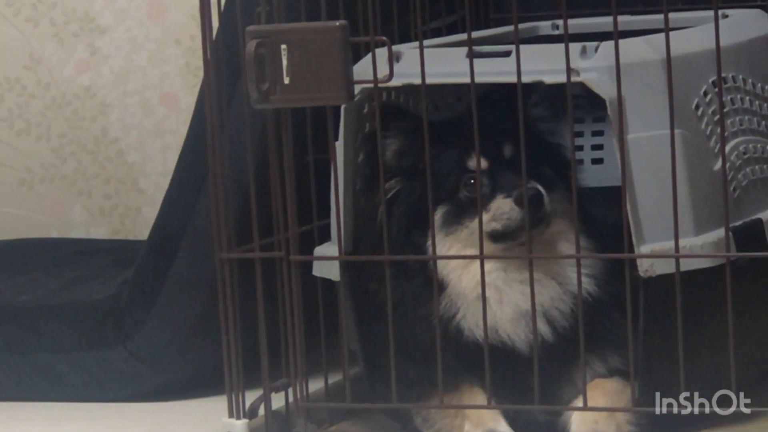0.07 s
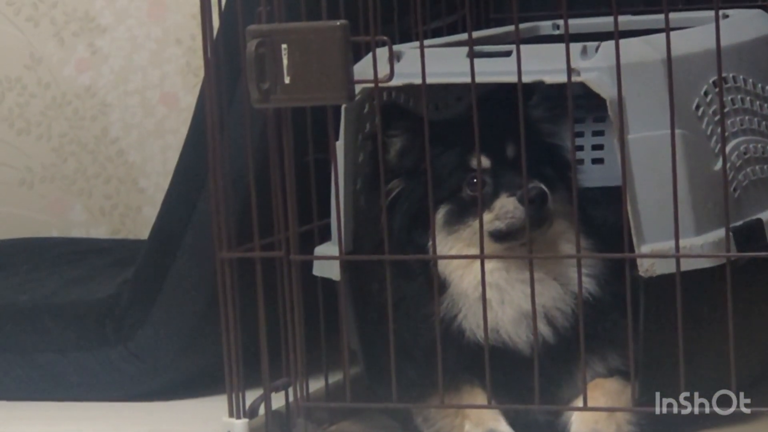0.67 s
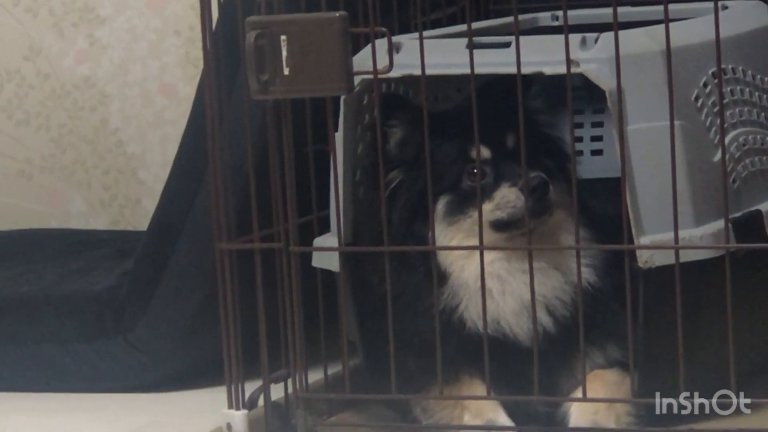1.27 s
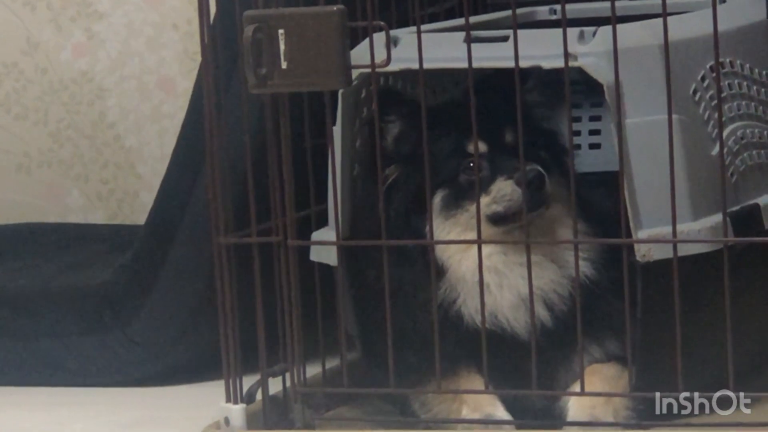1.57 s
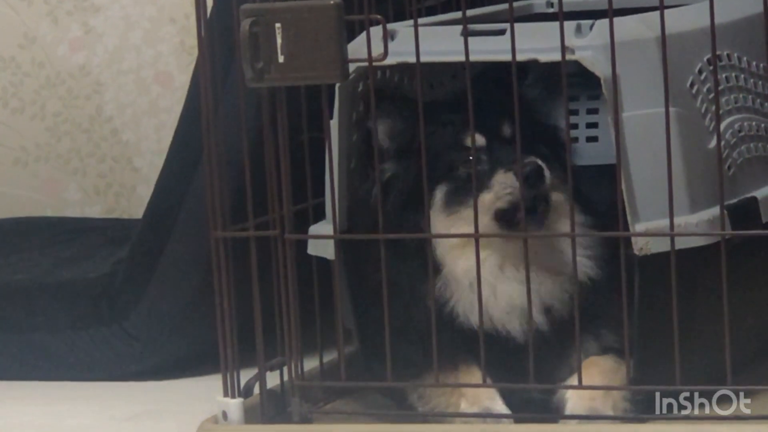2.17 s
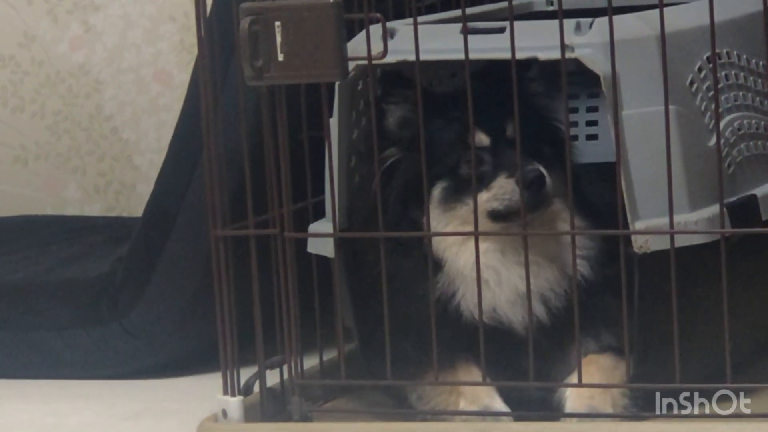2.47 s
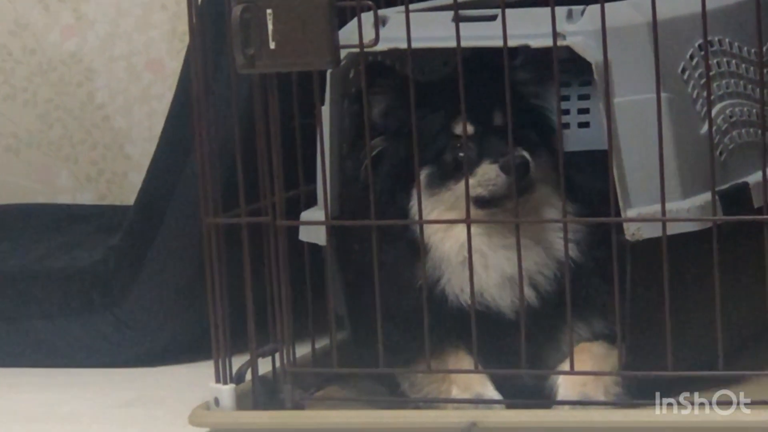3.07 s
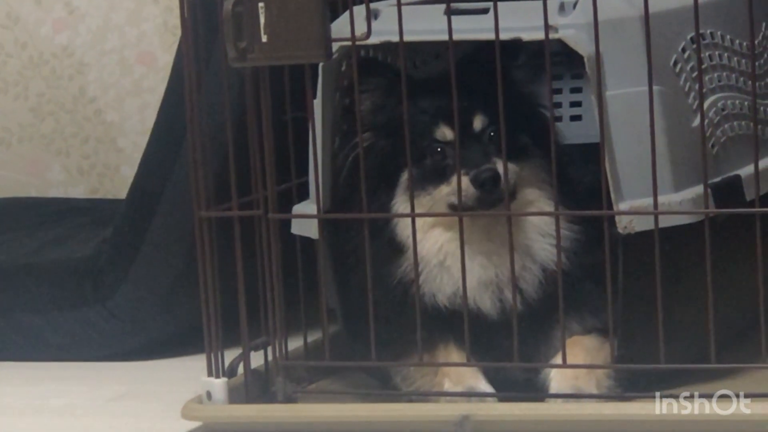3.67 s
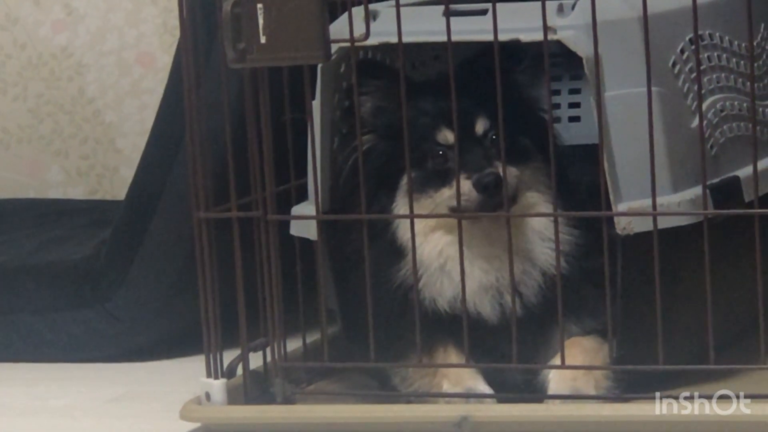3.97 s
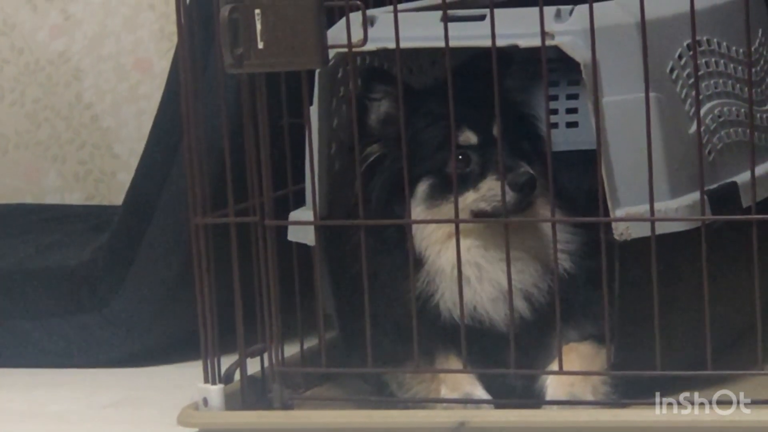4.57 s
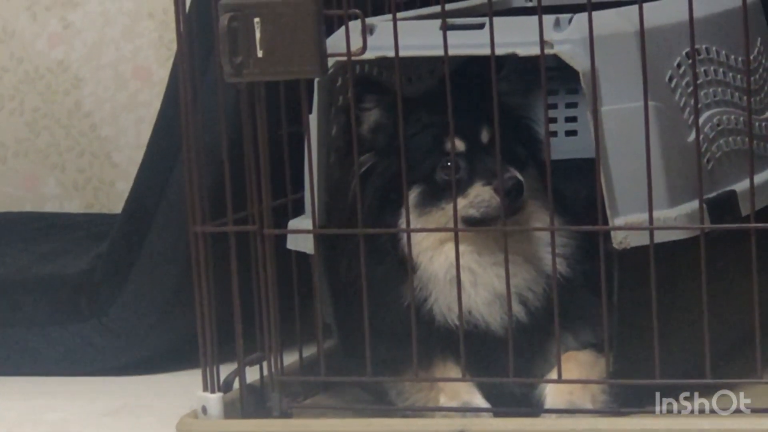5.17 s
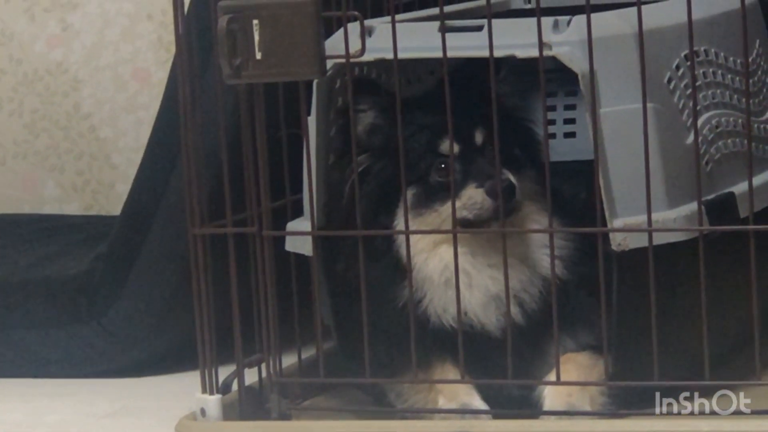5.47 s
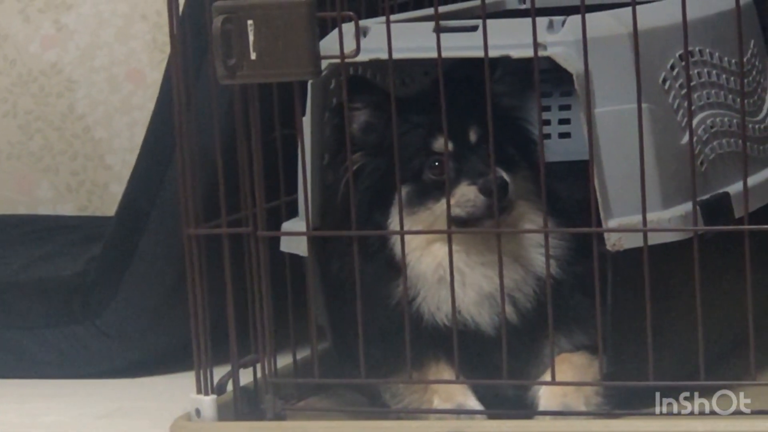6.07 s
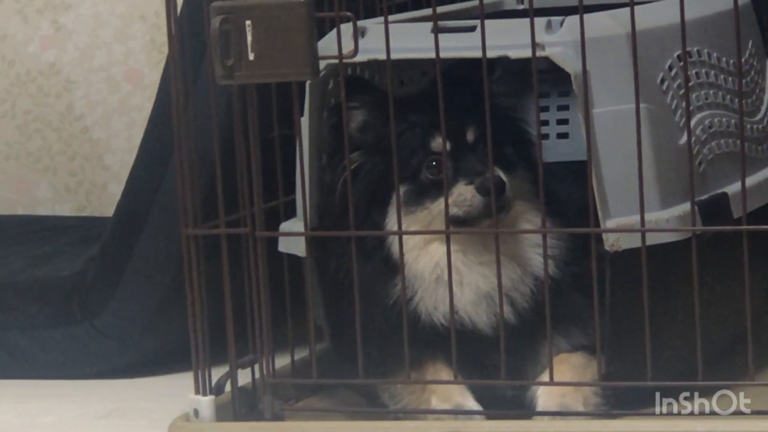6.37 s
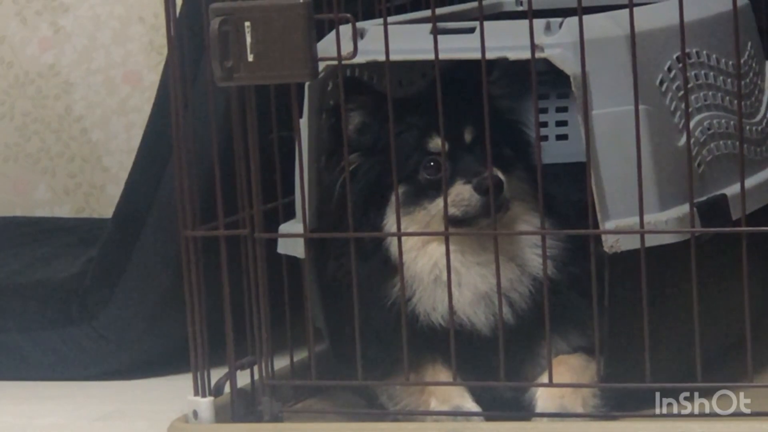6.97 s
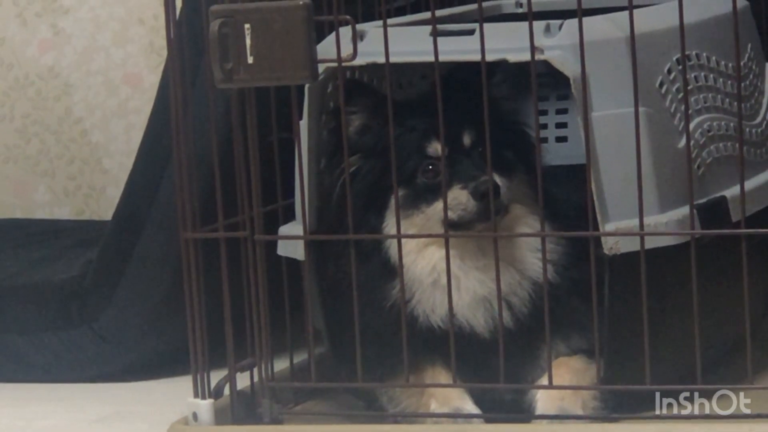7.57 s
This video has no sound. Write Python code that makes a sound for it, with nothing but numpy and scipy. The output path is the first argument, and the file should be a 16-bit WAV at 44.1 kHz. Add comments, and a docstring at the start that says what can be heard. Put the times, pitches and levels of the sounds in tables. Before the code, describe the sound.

A low, dull room tone runs throughout in a small, quiet room. Close to the microphone, a small dog lies in a plastic carrier inside a wire cage. At about 1 second it gives a soft, low, muffled wuff with its mouth shut, followed by a faint shuffle around 1.7 seconds. At about 2.1 seconds comes one sharp, raspy bark, by far the loudest sound: it starts in the nose, bursts open and drops in pitch, ringing briefly in the carrier and the room. After that there are only faint movements. A dull shuffle comes near 3.7 seconds, a tick at 4.4, and two light knocks at 5.4 and 5.6. Soft shuffles follow between 5.8 and 7 seconds, then two small ticks around 7.2. A barely audible sniff comes at 7.4 seconds, with a trace of fur rustling underneath.

```python
"""A small dog, close to the microphone, lying in a plastic carrier inside a wire cage in a quiet room.
It gives a muffled wuff with its mouth shut, then one sharp, raspy bark that starts in the nose and
bursts open: vocal folds and rushing air sound through nose, mouth and teeth. The carrier and the room
echo it briefly. A few faint knocks, ticks, shuffles and a sniff sound over the low room tone."""
import sys
import numpy as np
from scipy import signal
from scipy.fft import rfft, irfft
from scipy.io import wavfile
from scipy.ndimage import uniform_filter1d, minimum_filter1d

SR = 44100
rng = np.random.default_rng(int(sys.argv[2]) if len(sys.argv) > 2 else 0)


def file_out(sig):
    """Save sig as 16-bit WAV at sys.argv[1]."""
    # one column per channel
    cols = np.atleast_2d(sig).T
    # limit, then scale
    lim = np.clip(cols, -1, 1)
    pcm = np.round(lim * 32767).astype(np.int16)
    wavfile.write(sys.argv[1], SR, pcm)


N = 344862

BARK_S, WUFF_S = 2.123, 1.005
BARK_ROUGH, CLIMAX_ROUGH, GRUNT_JITTER, OPEN_JITTER = .88, .48, .22, .08


def bark(length_s=.152, lips_part_s=2.153, climax_s=2.226, sag_hz_per_s=3600):
    """A grunt starts in the nose, hisses past the lips, bursts from the open jaw and sags as it shuts."""
    t = BARK_S + np.arange(0, length_s, 1 / SR)
    parted = .5 + .5 * np.tanh((t - lips_part_s) / .004)
    jaw = swell(t, peak_s=2.208, rise_s=.052, fall_s=.055)
    # at its climax the voice is higher, cleaner and louder; then the pitch collapses
    climax = swell(t, climax_s, rise_s=.025, fall_s=.014)
    sag_hz = sag_hz_per_s * np.maximum(t - climax_s, 0)
    hz = np.maximum(435 + 62 * jaw + 62 * climax - sag_hz, 200)
    rough = BARK_ROUGH + (CLIMAX_ROUGH - BARK_ROUGH) * climax
    jitter = GRUNT_JITTER + (OPEN_JITTER - GRUNT_JITTER) * parted
    nose = undb(-27.5 + 5.5 * climax)
    mouth = undb(-66) + undb(-10.3) * jaw
    hiss = undb(-24) * parted * swell(t, peak_s=2.187, rise_s=.04, fall_s=.052)
    call = voice(t, hz, rough, nose, mouth, hiss, buzz_hz=1400, nose_air_db=-19, jitter=jitter)
    return gate(t, BARK_S, length_s) * call


def wuff(length_s=.098, sag_hz_per_s=380, fade_db_per_s=205, push_buzz_hz=400, hum_buzz_hz=130):
    """One push of air with the mouth shut dies away while the folds slacken to a low, clean hum."""
    t = np.arange(0, length_s, 1 / SR)
    push = .5 - .5 * np.tanh((t - .036) / .008)
    hz = 218 - sag_hz_per_s * t
    rough = .72 * push
    buzz_hz = hum_buzz_hz + (push_buzz_hz - hum_buzz_hz) * push
    nose = undb(-38.5 - fade_db_per_s * t)
    lip_leak = nose * undb(-21)
    hiss = undb(-67.5) * swell(t, peak_s=.039, rise_s=.032, fall_s=.065)
    call = voice(t, hz, rough, nose, lip_leak, hiss, buzz_hz, nose_air_db=-7.5, jitter=.15)
    return gate(t, 0, length_s) * call


# resonances of the nose with the mouth shut: f/Hz, level/dB
NOSE_TRACT = [(40, -37.5), (120, -15), (200, -3), (330, -2.5), (450, 5), (600, -2.5), (760, -17),
              (980, -6.5), (1900, -30.5), (2700, -29), (3300, -16), (4200, -27.5), (7200, -30.5),
              (9200, -12), (11500, -29)]
# resonances of the open mouth: f/Hz, level/dB
MOUTH_TRACT = [(50, -58.5), (200, -25), (500, -11), (720, -8.5), (900, -2), (1070, 0.5), (1400, -3.5),
               (1900, -8), (2400, -9.5), (3100, -12), (3700, -21), (5000, -26), (8000, -35.5), (16000, -51)]
# hiss at the teeth, heard up close: f/Hz, level/dB
TEETH_HISS = [(200, -32), (1500, -9), (2600, 4.5), (3700, -4), (4900, 1.5), (5600, -7.5), (6100, -8),
              (7900, -14), (9000, -8), (10200, -3), (11700, -19.5), (14000, -20), (15100, -8), (16000, -22)]


def voice(t, hz, rough, nose, mouth, hiss, buzz_hz, nose_air_db, jitter, growl=.35, shimmer=.15):
    """Vocal folds and the air between them sound through nose, mouth and teeth, each at its own gain."""
    wavering_hz = hz * (1 + jitter * rough * flutter(t, 400))
    phase = 2 * np.pi * np.cumsum(wavering_hz) / SR
    # in a rough voice every third cycle is the strongest, which puts growling lines between the harmonics
    line = 1 + np.arange(48)[:, None]
    ratio = line / 3
    weight = np.where(line % 3, growl * rough, 1) * np.minimum(line / 2, 1) ** 2
    # slack folds give a dull tone, tight ones buzz up to a higher frequency
    weight = weight / (1 + (ratio * hz / buzz_hz) ** 3)
    folds = np.sum(weight * np.cos(ratio * phase), axis=0) / np.linalg.norm(weight, axis=0)
    # air comes in puffs that follow the same cycles
    puffs = (1 + .57 * np.cos(phase)) * (1 + growl * rough * np.cos(phase / 3))
    air = puffs * rng.standard_normal(len(t))

    def through(tract, air_gain):
        """Tone and air shaped by one passage, at an rms near 1."""
        return (unit(colour(folds, tract)) + air_gain * unit(colour(air, tract))) / np.hypot(1, air_gain)

    sound = nose * through(NOSE_TRACT, undb(nose_air_db))
    sound += mouth * through(MOUTH_TRACT, undb(2) * rough)
    sound += hiss * unit(colour(air, TEETH_HISS))
    return sound * np.exp(shimmer * rough * flutter(t, 250))


# one sniff, faint even this near the microphone: t/s, level/dB, length/s
SNIFFS = [(7.434, -66.5, 0.053)]
# its thin band of hiss: f/Hz, level/dB
SNIFF_BAND = [(2000, -25), (7500, -18), (9300, -4), (11000, -20), (16000, -25)]


def sniff():
    """A short draw of air hisses in the dog's nose."""
    out = np.zeros(N)
    for start, db, length in SNIFFS:
        puff = signal.windows.tukey(int(length * SR))
        hiss = unit(colour(rng.standard_normal(len(puff)), SNIFF_BAND))
        add(out, start, undb(db) * puff * hiss)
    return out


# standing waves in the carrier, right around the dog: f/Hz, width/Hz, level/dB
CARRIER_MODES = [(204.8, 20, -2.5), (372, 26, -3), (549, 42, -2), (734.3, 23, -1.5), (1006, 150, -3),
                 (1360, 30, -0.5), (1660, 55, -0.5), (1905, 80, 1), (2335, 40, 1.5), (2766, 40, 1.5),
                 (3170, 70, -2), (4822, 90, -0.5), (5200, 70, -1.5)]


def dog_in_carrier(gain_db=-3.5):
    """Wuff, bark and sniff reach the microphone directly and through the carrier's ringing hollow."""
    direct, hollow = np.zeros(N), np.zeros(N)
    add(direct, WUFF_S, wuff())
    add(direct, BARK_S, bark())
    direct += sniff()
    for hz, width, db in CARRIER_MODES:
        hollow += undb(db) * signal.lfilter(*signal.iirpeak(hz, hz / width, fs=SR), direct)
    return undb(gain_db) * (direct + hollow)


# hard knocks and ticks on carrier and cage: t/s, level/dB, t60/s, tilt/(dB per octave)
KNOCKS = [(4.364, -54.5, .042, -0.5), (5.373, -47.5, 0.29, -.3), (5.632, -50.3, .15, -2.3),
          (7.167, -61, .025, 4), (7.238, -56.5, 0.05, 1.1)]
# soft shuffles as the dog shifts its weight: t/s, level/dB, t60/s, tilt/(dB per octave)
SHUFFLES = [(1.657, -48, .18, -4.5), (3.735, -50, .08, -15), (5.79, -60.5, 0.45, -3),
            (6.02, -56, .15, -4.5), (6.77, -53, 0.18, -8)]
# the spectrum that carrier and cage ring with: f/Hz, level/dB
CAGE_BODY = [(80, -11), (240, 5), (500, 2), (1000, -0.5), (1600, -4), (2150, -4), (2900, -4), (4200, -5),
             (6500, -11.5), (8500, -19.5), (13500, -15.5), (16000, -27)]


def knocks_and_shuffles(hard_contact_s=.0005, soft_contact_s=.015, size=16384):
    """Each contact sets off a dense, quickly dying ring; soft ones swell slowly and sound dull."""
    out, t = np.zeros(N), np.arange(size) / SR
    for contacts, contact_s in (KNOCKS, hard_contact_s), (SHUFFLES, soft_contact_s):
        for start, db, t60, tilt in contacts:
            ring = unit(colour(rng.standard_normal(size), CAGE_BODY, tilt))
            envelope = (1 - np.exp(-t / contact_s)) * np.exp(-np.log(1000) * t / t60)
            add(out, start, undb(db) * envelope * ring)
    return out


def fur_rustle(level_db=-74.5, patchy_db=2.6):
    """Fur brushes the carrier very faintly, coming and going at random."""
    brushing = undb(level_db + patchy_db * flutter(np.arange(N) / SR, rate_hz=9))
    return brushing * unit(colour(rng.standard_normal(N), CAGE_BODY, tilt=-1.2))


# decay of the room around the microphone: f/Hz, t60/s
ROOM_T60 = [(125, 0.21), (450, .2), (1100, .25), (2500, .27), (5000, .24), (10000, 0.25), (16000, .24)]


def room_echo(x, echo_db=-9, build_s=.0032, size=24000):
    """A small furnished room adds diffuse echoes that build quickly and die at each octave's own pace."""
    t, hz = np.arange(size) / SR, np.fft.rfftfreq(size, 1 / SR)
    scatter, tail = rfft(rng.standard_normal(size)), np.zeros(size)
    centres = np.geomspace(70, 16000, 9)
    for centre, share in zip(centres, np.eye(len(centres))):
        band = irfft(scatter * on_log_axis(np.c_[centres, share], hz), size)
        tail += band * np.exp(-np.log(1000) * t / on_log_axis(ROOM_T60, centre))
    tail *= 1 - np.exp(-(t / build_s) ** 2)
    return x + undb(echo_db) * signal.fftconvolve(x, tail / np.linalg.norm(tail))[:N]


# the room's air at the microphone: f/Hz, relative level/dB
AIR_SPECTRUM = [(12, -47.5), (20, -21), (41, -4), (85, -3.5), (101, -4.5), (119, -7.5), (176, -5),
                (254, -6.5), (431, -13.5), (554, -12.5), (775, -17), (1600, -20.5), (5470, -30.5),
                (14500, -37), (15800, -37.5)]
# the room's lowest resonances: f/Hz, width/Hz, level/dB
ROOM_MODES = [(59.24, 7, -76.5), (79, 8, -76.5), (91.5, 9, -74.5)]


def room_tone(air_db=-63):
    """Steady, dull air noise with a rumble in the room's lowest resonances."""
    out = undb(air_db) * noise(lambda f: undb(on_log_axis(AIR_SPECTRUM, f)))
    for hz, width, db in ROOM_MODES:
        out += undb(db) * noise(lambda f: 1 / (1 + (2 * (f - hz) / width) ** 2))
    return out


def gate(t, start, length, attack_s=.0045, release_s=.014):
    """Attack, hold and release of a call, 0-1."""
    return np.clip((t - start) / attack_s, 0, 1) * np.clip((start + length - t) / release_s, 0, 1)


def swell(t, peak_s, rise_s, fall_s):
    """A bell that is 1 at the peak and a tenth of that one rise before and one fall after."""
    return 10 ** -((t - peak_s) / np.where(t < peak_s, rise_s, fall_s)) ** 2


def flutter(t, rate_hz):
    """Random wavering with a spread near 1, new values at the given rate."""
    return np.interp((t - t[0]) * rate_hz, np.arange(len(t)), rng.standard_normal(len(t)))


def noise(gain):
    """Noise of rms 1 whose spectrum follows gain(f/Hz)."""
    return unit(irfft(rfft(rng.standard_normal(N)) * gain(np.fft.rfftfreq(N, 1 / SR)), N))


def colour(x, outline, tilt=0, size=4096):
    """Causal filter with the given (f/Hz, level/dB) outline, tilted in dB per octave."""
    hz = np.fft.rfftfreq(size, 1 / SR)
    db = on_log_axis(outline, hz) + tilt * np.log2(np.maximum(hz, 200) / 1000)
    cepstrum = irfft(np.log(undb(db)))
    # folding the cepstrum onto positive time gives minimum phase
    cepstrum[1:size // 2] *= 2
    cepstrum[size // 2 + 1:] = 0
    impulse = irfft(np.exp(rfft(cepstrum)))
    return signal.fftconvolve(x, impulse)[:len(x)]


def on_log_axis(points, hz):
    """Read (f/Hz, value) points at the given frequencies."""
    at, value = np.transpose(points)
    return np.interp(np.log(hz + 1e-3), np.log(at), value)


def undb(db):
    """Decibels to gain."""
    return 10 ** (np.asarray(db) / 20)


def unit(x):
    """Scale to rms 1."""
    return x / np.sqrt(np.mean(x ** 2) + 1e-18)


def add(out, start_s, x):
    """Mix x in at the given time."""
    i = int(start_s * SR)
    out[i:i + len(x)] += x[:N - i]


def scene():
    """One microphone near the cage: the dog and its small movements in front, room tone behind."""
    movements = knocks_and_shuffles() + fur_rustle()
    return (room_echo(dog_in_carrier() + movements) + room_tone())[None]


def record(dry, low_hz=38, top_hz=15750, ceiling=.72, hold_samples=220):
    """The recorder cuts the deepest bass, holds down any peak above its ceiling and cuts the top."""
    low_cut = signal.sosfilt(signal.butter(4, low_hz, "high", fs=SR, output="sos"), dry)
    gain = np.minimum(1, ceiling / (np.abs(low_cut) + 1e-9))
    smooth_gain = uniform_filter1d(minimum_filter1d(gain, hold_samples), hold_samples)
    return signal.sosfilt(signal.ellip(10, .2, 80, top_hz, fs=SR, output="sos"), low_cut * smooth_gain)


dry = scene()
out = record(dry)
file_out(out)
```